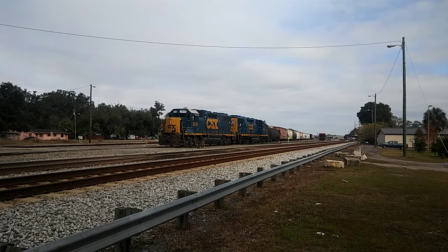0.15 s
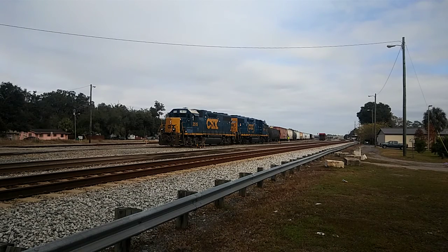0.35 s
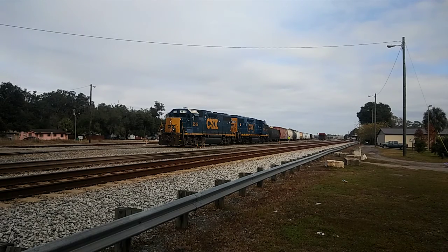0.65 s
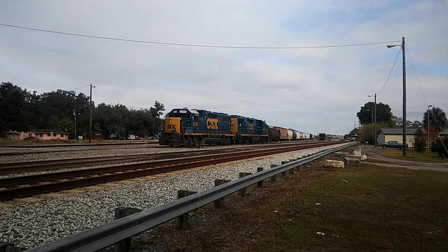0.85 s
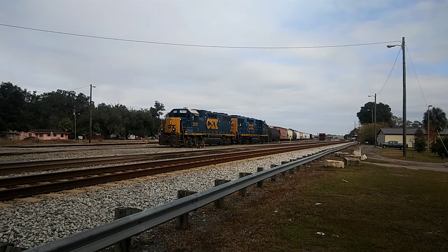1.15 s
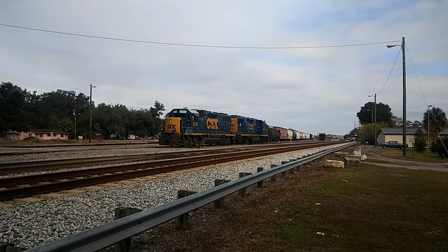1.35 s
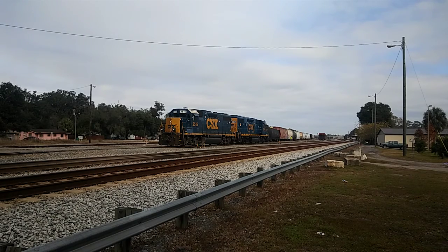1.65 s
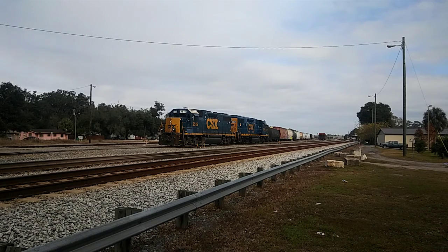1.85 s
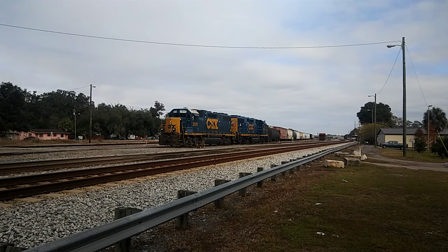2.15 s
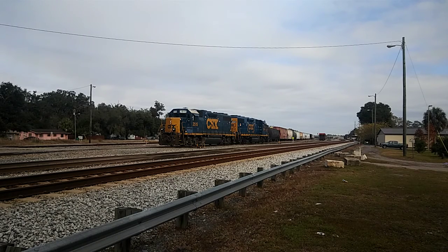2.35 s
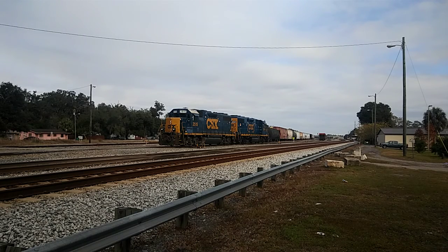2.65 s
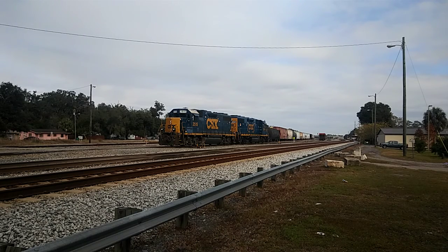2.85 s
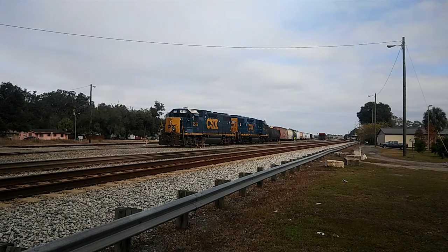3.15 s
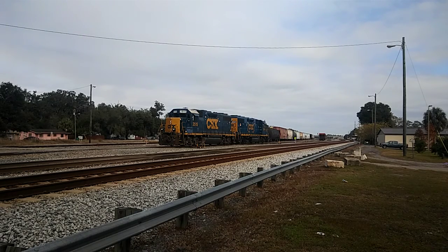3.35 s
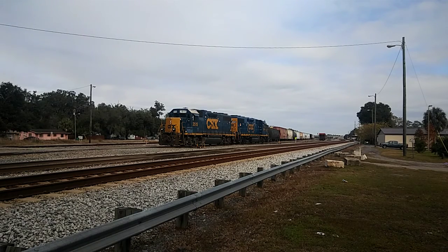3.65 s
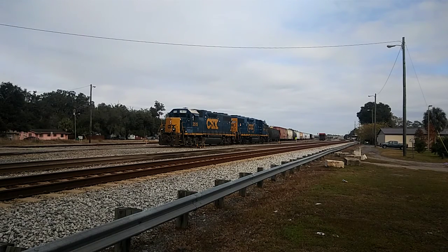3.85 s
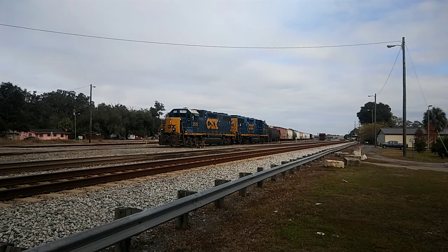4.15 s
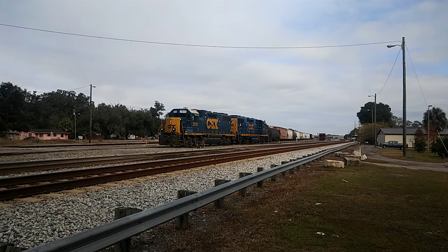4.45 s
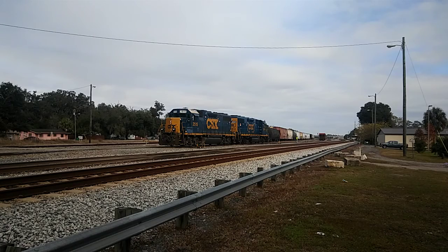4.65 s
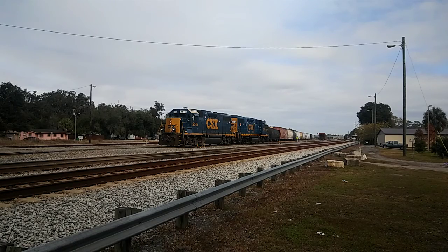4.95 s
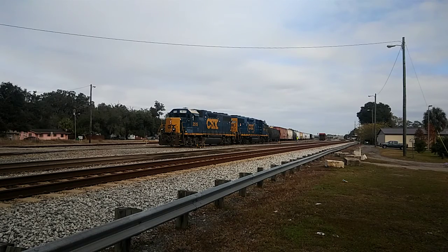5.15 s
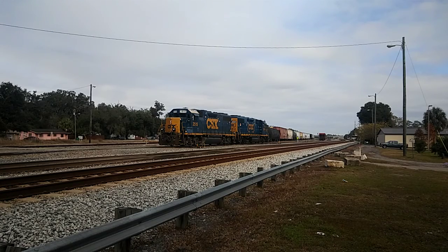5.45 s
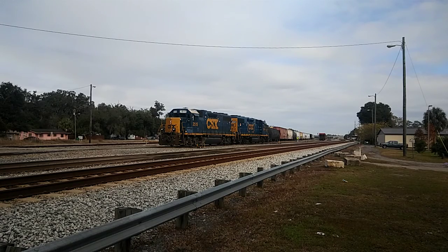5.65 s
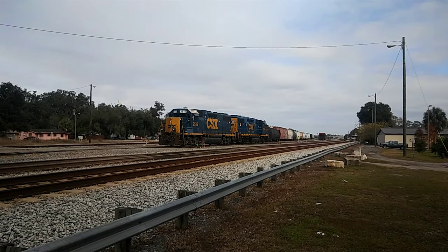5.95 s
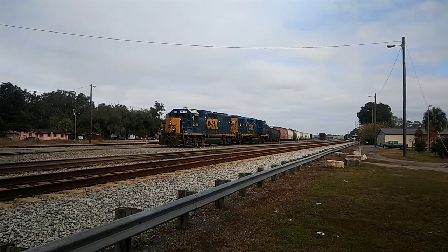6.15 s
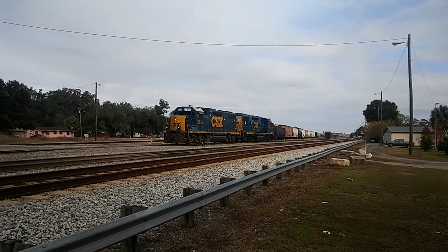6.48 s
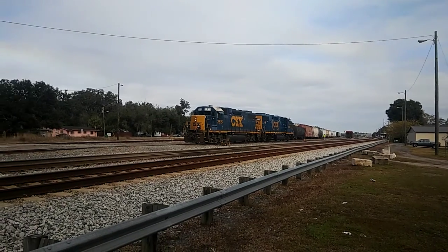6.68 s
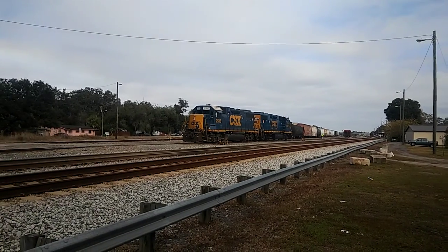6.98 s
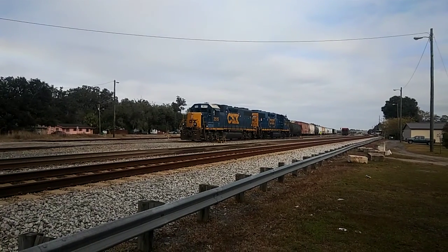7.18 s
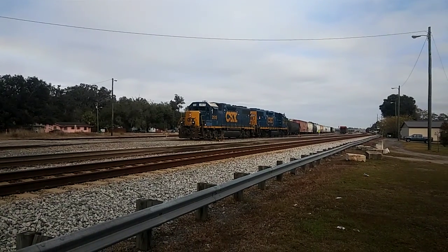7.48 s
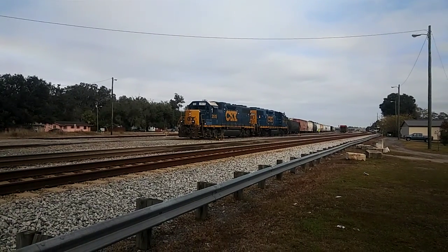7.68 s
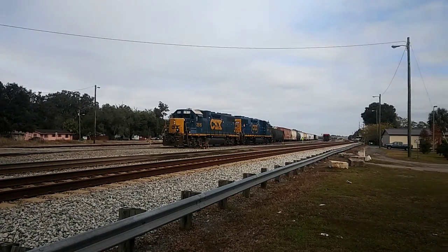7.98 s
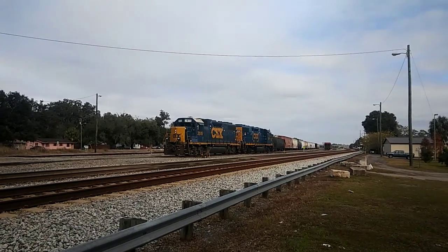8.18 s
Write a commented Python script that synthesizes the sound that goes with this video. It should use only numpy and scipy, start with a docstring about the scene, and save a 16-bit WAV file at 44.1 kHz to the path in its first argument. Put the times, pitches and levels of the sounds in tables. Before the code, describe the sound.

Outdoors in a rail yard, a diesel locomotive idles some way off with quick low chugs, uneven thumps and rattling panels. A thin air leak swells into a brief moan, then a loud hiss vents for over two seconds and cuts off sharply, echoing off wagons and trees. The quieter idle continues with small metal clinks, a wavering gear whine and a few plastic clicks close to the microphone.

```python
"""A diesel locomotive idles some way off in a rail yard: crank-timed exhaust chugs, uneven thumps and knocks,
rattling panels and gear whine, made from ringing noise and swept sines; a thin air leak is coloured noise.
A valve moans, then vents air in a loud hiss for over two seconds and snaps shut; wagons and trees echo it.
Metal clinks now and then (decaying sines); a few small plastic clicks follow close to the microphone."""
import sys
import numpy as np
from scipy import signal
from scipy.fft import rfft, irfft, next_fast_len
from scipy.io import wavfile
from scipy.ndimage import map_coordinates

SR = 44100
rng = np.random.default_rng(int(sys.argv[2]) if len(sys.argv) > 2 else 0)


def to_wav(sig):
    """Store sig (one row per channel, or 1-D mono) as 16-bit WAV at the path in sys.argv[1].

    Samples outside -1..1 are clipped; the rate is SR.
    """
    pcm = np.clip(np.atleast_2d(sig), -1, 1) * 32767
    pcm = np.round(pcm).astype(np.int16)
    wavfile.write(sys.argv[1], SR, pcm.T)  # frames by channels


N = 366972
T = np.arange(N) / SR
SIZE = next_fast_len(N, real=True)
FREQ = np.maximum(np.fft.rfftfreq(SIZE, 1 / SR), 1e-3)  # Hz, kept above 0 for the logarithm

CRANK_HZ, FIRST_CHUG_S = 5.356, 0.135
EASE_DB_PER_S = -0.52  # chugs and exhaust slowly quieten
OPEN_S, SHUT_S = 1.385, 3.758  # valve


def undb(db):
    """Decibels to gain."""
    return 10 ** (np.asarray(db) / 20)


def curve(rows):
    """Rows of (s, value) as a control over time."""
    return np.interp(T, *np.transpose(rows))


def colour(points, peaks=()):
    """Gain over frequency: a smooth slope lifted by resonances."""
    hz, db = np.transpose(points)
    lift_db = sum(d * np.exp(-((FREQ - f) / w) ** 2) for f, w, d in peaks)
    return undb(np.interp(np.log(FREQ), np.log(hz), db) + lift_db)


def resonances(modes):
    """Gain over frequency of summed resonances; modes are (Hz, half width Hz, dB)."""
    return sum(undb(d) / (1 + ((FREQ - f) / w) ** 2) for f, w, d in modes)


def ring(x, gain):
    """Pass an excitation through a response; rms 1."""
    y = irfft(rfft(x, SIZE) * gain, SIZE)[:N]
    return y / np.std(y)


def noise(gain):
    """White noise through a response; rms 1."""
    return ring(rng.standard_normal(N), gain)


def walk(rate_hz):
    """Smooth random control, spread 1, changing about rate_hz times a second."""
    return noise(np.exp(-(FREQ / rate_hz) ** 2))


def burst(start_s, rise_s, t60_s):
    """Envelope of a blow: a linear rise, then an exponential fall."""
    age = T - start_s
    fall = np.exp(-np.log(1000) * np.clip((age - rise_s) / t60_s, 0, 3))
    return np.clip(age / rise_s, 0, 1) * fall


def flutter(x, depth_db, span_hz, rate_hz):
    """Moving outdoor air makes patches of the spectrum swell and fade on their own; the rms is kept."""
    f, t, z = signal.stft(x, SR, nperseg=1024, noverlap=768)
    patches = np.clip(rng.standard_normal((400, 400)), -1.7, 1.7)
    grid = np.meshgrid(f / span_hz, t * rate_hz, indexing="ij")
    swell = map_coordinates(patches, grid, order=3, mode="mirror")
    y = signal.istft(z * undb(depth_db * swell), SR, nperseg=1024, noverlap=768)[1][:N]
    return y * np.std(x) / np.std(y)


def crank_angle():
    """Crank phase in radians, zero at each chug."""
    return 2 * np.pi * CRANK_HZ * (T - FIRST_CHUG_S)


def exhaust():
    """Exhaust and stack resonances swell once per crank turn, each exhaust mode at its own moment."""
    # Each row: resonance in Hz, half width in Hz, relative level in dB, lag behind the crank in radians.
    exhaust_modes = [(201.5, 16, -0.5, 1.1), (135, 14, -3, -.4), (108, 12, -7.5, .3), (84, 8.4, -3, 1.4),
                     (44, 4, -18.5, 0)]
    # Each row: stack resonance in Hz, half width in Hz, relative level in dB.
    stack_modes = [(267, 11, 4), (338.4, 7, 5.5), (390, 9.4, -7), (605, 55, -10)]
    angle = crank_angle()
    pulses = 0
    for hz, width_hz, db, lag in exhaust_modes:
        pulses = pulses + noise(resonances([(hz, width_hz, 0)])) * undb(db + 8.5 * np.cos(angle - lag))
    pulses = pulses * undb(-66 + EASE_DB_PER_S * T)
    stack = noise(resonances(stack_modes)) * undb(-64 + 4.5 * np.cos(angle + 0.26))
    return pulses + stack


def chugs():
    """Each crank turn gives one exhaust chug that sinks in pitch; strength varies at random."""
    centre_hz, sag_oct_per_s, half_length_s = 121.6, 6.3, 0.025
    level_db, scatter_db = -50.5, 0.5
    turns = (T - FIRST_CHUG_S) * CRANK_HZ
    nearest = np.round(turns).astype(int)
    age = (turns - nearest) / CRANK_HZ  # negative before the height of a chug
    draws = rng.standard_normal(nearest.max() + 2)
    strength_db = level_db + scatter_db * draws[nearest + 1]
    phase = 2 * np.pi * np.cumsum(centre_hz * 2 ** (-sag_oct_per_s * age)) / SR
    envelope = undb(strength_db + EASE_DB_PER_S * T) * np.exp(-(age / half_length_s) ** 2)
    return envelope * np.sin(phase + 0.22 * walk(40))


def panels():
    """Engine panels ring as fluttering noise: clatter follows the crank, and one spell shakes harder."""
    # Each row: resonance in Hz, half width in Hz, relative level in dB.
    clatter_modes = [(651, 57, -7), (835.6, 52, 0.5), (1130, 28, -6.5), (1276, 20, 7.5), (1334, 110, -2),
                     (1620, 98, -11), (1885, 45, -8)]
    # Each row: resonance in Hz, half width in Hz, relative level in dB.
    rattle_modes = [(2120, 35, 2), (2430, 52, -4.5), (2530, 230, -2), (2890, 80, 0), (3150, 60, -12.5),
                    (3480, 72, -6.5), (4410, 120, -11), (4860, 61, -19.5)]
    shake_s, shake_width_s, peak_lift_db = 6.09, 0.2, 3
    shake_db = peak_lift_db * np.exp(-((T - shake_s) / shake_width_s) ** 2)
    clatter = flutter(noise(resonances(clatter_modes)), depth_db=11.0, span_hz=132.8, rate_hz=28)
    clatter = clatter * undb(-58 + 0.46 * shake_db + 2 * np.cos(crank_angle()))
    rattle = flutter(noise(resonances(rattle_modes)), depth_db=11.0, span_hz=171.2, rate_hz=32)
    return clatter + rattle * undb(-66.5 + shake_db)


def gear_whine():
    """Gears whine: a tone unsteady in pitch and level, over a narrow noise band."""
    # Each row: time in seconds, level in dB before the floor and lift below.
    whine_level = [(3.92, -63), (4.77, -58.5), (5.3, -88), (5.36, -59), (5.65, -84), (5.74, -60.5),
                   (7.21, -58.5), (7.44, -81), (7.47, -54.5), (7.59, -81), (7.75, -61.5), (8.2, -65)]
    phase = 2 * np.pi * np.cumsum(1690 + 20 * walk(45)) / SR
    tone = np.sin(phase) * (1 + 0.95 * np.tanh(1.3 * walk(16)))
    band = 0.62 * noise(resonances([(1680, 28, 0)]))
    return (tone + band) * undb(np.maximum(curve(whine_level), -74) + 2.5)


def engine_rumble():
    """Broad engine rumble: coloured noise with a moving spectrum."""
    # Each row: frequency in Hz, relative level in dB.
    rumble_colour = [(20, -37), (32, -25), (45, -9), (90, 1), (160, 1.5), (300, -4.5), (600, -1.5),
                     (1000, -9.5), (2000, -21), (3000, -26), (5400, -40), (9000, -49.5), (12300, -43.5),
                     (13500, -60)]
    return flutter(noise(colour(rumble_colour)), depth_db=3.0, span_hz=131, rate_hz=18) * undb(-57.5)


def valve_lift():
    """Valve motion from 0 to 1 up to opening; the fall after it shapes the end of the moan."""
    lift_s, moan_t60_s = 0.15, 0.1
    return burst(OPEN_S - lift_s, lift_s, moan_t60_s)


def valve_leak():
    """Air whistles past the seat as resonant noise, growing as the valve lifts, until it opens."""
    # Each row: frequency in Hz, relative level in dB.
    leak_colour = [(800, -111), (2400, -7.5), (3400, -3), (4600, -13), (5700, -21.5), (8000, -27),
                   (11000, -38), (14000, -54)]
    # Each row: resonance in Hz, half width in Hz, lift in dB.
    leak_peaks = [(2632, 60, 19), (3670, 57, 12), (4358, 91, 20.5), (4560, 110, 17), (4870, 320, 20),
                  (6060, 170, 18), (6416, 77, 22), (7480, 460, 6.5), (8620, 73, 15), (10130, 150, 16),
                  (11860, 579, 21)]
    leak = flutter(noise(colour(leak_colour, leak_peaks)), depth_db=5, span_hz=138.3, rate_hz=13.2)
    return leak * undb(-55.5 + 7.5 * valve_lift()) * (T < OPEN_S)


def thumps(width_hz=55, tail_db=-9, tail_t60_s=0.26, sag=0.22):
    """Uneven heavy firings boom in the stack, sink in pitch and trail off in a rough rumble."""
    # Each row: start in seconds, boom level in dB, stack resonance in Hz.
    firings = [(0, -45.5, 267), (.128, -37.5, 321), (0.265, -38, 346), (0.385, -45.5, 354),
               (.489, -32, 304), (0.861, -42.5, 296), (1.25, -44.5, 327), (1.418, -40.5, 127.4),
               (2.34, -44, 130.5), (2.717, -46, 342), (3.259, -47, 341), (3.41, -47.5, 393),
               (3.59, -25, 210.5), (3.665, -43, 140), (3.68, -41.5, 285), (3.8, -46, 367),
               (3.84, -39, 139.4), (4.441, -41.5, 272), (4.621, -43, 266), (4.803, -36, 263),
               (4.877, -44, 396), (4.983, -37.5, 264.4), (5.179, -42.5, 267), (6.679, -47, 330),
               (6.862, -45.5, 339), (7.44, -49, 409), (7.764, -47.5, 346), (7.879, -46, 325)]
    soft_t60_s, snap_db = 0.145, -25.5  # a firing at snap_db dies twice as fast as a soft one
    out = np.zeros(N)
    grit, wobble = walk(width_hz), walk(width_hz)
    for s, db, hz in firings:
        age = np.maximum(T - s, 0)
        phase = 2 * np.pi * hz * (T - s - sag * 0.011 * np.exp(-age / 0.0096))
        t60_s = soft_t60_s / (1 + undb(db - snap_db) ** 2)
        boom = burst(s, 0.014, t60_s) * np.sin(phase + 0.62 * wobble)
        rough = grit * np.sin(phase) + wobble * np.cos(phase)
        out += undb(db) * (boom + undb(tail_db) * burst(s - 0.015, 0.072, tail_t60_s) * rough)
    return out


def clinks(t60_s=0.21):
    """Loose metal on the locomotive: each part rings briefly at one unsteady pitch."""
    # Each row: start in seconds, peak level in dB, pitch in Hz.
    clink_hits = [(.025, -44.5, 837), (.47, -45, 1357), (1.035, -51, 850), (4.398, -43.5, 853),
                  (4.6, -41.5, 1417), (4.61, -41.5, 763), (5.101, -48, 1282), (5.341, -48.5, 1320),
                  (5.82, -49, 1322), (6.141, -50, 1130), (7.39, -48, 1455), (7.408, -48.5, 1083),
                  (7.901, -47, 1227)]
    wobble = walk(60)
    out = np.zeros(N)
    for s, db, hz in clink_hits:
        out += undb(db) * burst(s, 0.0032, t60_s) * np.sin(2 * np.pi * hz * (T - s) + 0.63 * wobble)
    return out


def knocks(rate_hz=4, centre_hz=350, spread_oct=0.2, level_db=-53, scatter_db=3.5, t60_s=0.082):
    """Lighter firings knock in the stack at random times, strengths and pitches."""
    draws = rng.standard_normal((60, 3))  # log gap, strength, pitch
    times = np.cumsum(np.exp(0.5 * draws[:, 0]) / rate_hz)
    out = np.zeros(N)
    for s, (_, size, pitch) in zip(times, draws):
        if s < T[-1]:
            hz = centre_hz * 2 ** (spread_oct * pitch)
            out += undb(level_db + scatter_db * size) * burst(s, 0.01, t60_s) * np.sin(2 * np.pi * hz * (T - s))
    return out


def valve_moan():
    """Pipe tones, as narrow noise bands, moan ever louder while the valve lifts."""
    # Each row: pipe tone in Hz, half width in Hz, relative level in dB.
    pipe_tones = [(503, 39, 4.5), (1563, 40, -2.5), (2725, 95, -11.5), (3786, 70, -19.5), (4570, 45, -27.5)]
    moan = flutter(noise(resonances(pipe_tones)), depth_db=6.0, span_hz=93.7, rate_hz=22)
    return moan * undb(-37) * valve_lift()


def air_jet():
    """The open valve roars through its resonances; as pressure drops the jet weakens a little and thins."""
    # Each row: frequency in Hz, relative level in dB.
    jet_colour = [(200, -61), (600, -24), (950, -17), (1300, -6), (2000, 0.5), (3000, -1.5), (4400, -1),
                  (5700, -6), (6500, -12.5), (7000, -10), (8700, -16.5), (10200, -16), (13000, -20),
                  (15000, -18)]
    # Vent and underframe. Each row: resonance in Hz, half width in Hz, lift in dB.
    jet_peaks = [(846.5, 67, 17), (1108, 80, 17.5), (1248, 22, 7.5), (1374, 110, 10.5), (1567, 37, 7),
                 (1693, 15, 2), (1790, 250, 5), (2157, 89, 5.5), (2687, 240, 7), (2953, 75, 7),
                 (3186, 130, 6), (3442, 85, 8.5), (3714, 125, 7), (3970, 150, 3.5), (4260, 120, 5.5),
                 (4570, 106, 5), (5260, 53, 3.5), (6285, 360, 7)]
    # Low edge of the hiss, below about 960 Hz, coming and going.
    # Each row: time in seconds, level in dB before a 0.8 dB lift.
    low_edge_level = [(1.42, -54), (1.49, -60.5), (1.67, -39), (1.95, -80.5), (1.99, -45.5), (2.4, -48.5),
                      (2.53, -74), (2.6, -41.5), (2.68, -61), (2.76, -45), (2.89, -65), (3.13, -45),
                      (3.54, -65), (3.6, -80)]
    steady_db, surge_db, surge_s, shut_t60_s = -27, 1.5, 0.77, 0.16
    age = np.clip(T - OPEN_S, 0, SHUT_S - OPEN_S)
    jet = flutter(noise(colour(jet_colour, jet_peaks)), depth_db=2.0, span_hz=99.2, rate_hz=12)
    under = 1 / (1 + (FREQ / 960) ** 30)
    low = 1 / (1 + (FREQ / 1520) ** 20)
    top = 1 / (1 + (7500 / FREQ) ** 12)
    low_edge = flutter(ring(jet, under), depth_db=5, span_hz=200, rate_hz=26)
    low_edge = low_edge * undb(curve(low_edge_level) + 0.8)
    # the roar fades as the pipe empties while the treble grows
    roar = ring(jet, low - under) * undb(-9 - 3.5 * age + 0.3 * walk(8.3))
    hiss = ring(jet, 1 - low - top) * undb(0.44 + 0.27 * walk(13.0))
    fizz = ring(jet, top) * undb(-18 + 1.67 * age + 0.4 * walk(18))
    pressure = undb(steady_db + surge_db * np.exp(-(age / surge_s) ** 2))
    opening = np.clip((T - OPEN_S) / 0.008, 0, 1)
    closing = np.exp(-np.log(1000) * np.clip((T - SHUT_S) / shut_t60_s, 0, 3))
    return ((roar + hiss + fizz) * pressure + low_edge) * opening * closing


def yard(x, wet_db, t60_low_s, absorb_hz, echo_db, echo_s):
    """Scatter from wagons and ballast, air absorbing the treble first, ends in a smeared echo from trees."""
    scatter = 0
    for hz in np.arange(1, 17, 2) * 1000:
        band = np.abs(FREQ - hz) < 1000
        t60_s = t60_low_s / (1 + (hz / absorb_hz) ** 2)
        scatter = scatter + noise(band) * burst(0.005, 0.0032, t60_s)
    # far paths graze the ground, which swallows the middle; nothing returns from beyond the trees
    ground = undb(-8 * np.exp(-((FREQ - 2100) / 600) ** 2))
    scatter = ring(scatter, ground) / (1 + (T / echo_s) ** 12)
    trees = noise(np.exp(-((FREQ - 3900) / 1200) ** 2)) * np.exp(-((T - echo_s) / 0.0514) ** 2)
    tail = undb(wet_db) * scatter / np.linalg.norm(scatter) + undb(echo_db) * trees / np.linalg.norm(trees)
    return x + signal.fftconvolve(x, tail[:SR])[:N]


def clicks(body_t60_s=0.044, ring_t60_s=0.021, snap_t60_s=0.0095, tail_db=-21, tail_t60_s=0.49):
    """Small plastic clicks: a rough knock on a few modes, a gritty ring and a snap, each with a faint tail."""
    # Each row: start in seconds, then body, ring and bright snap levels in dB before the offsets below.
    click_hits = [(6.315, -41.5, -74, -80), (6.333, -46, -70, -52), (6.346, -41, -55, -54),
                  (6.368, -52, -50, -64), (6.379, -52, -72, -59), (6.486, -59, -59.5, -42),
                  (7.202, -45, -54, -83), (7.644, -45, -53, -62), (8.2941, -29, -52, -63)]
    # Each row: body mode in Hz, relative level in dB.
    body_modes = [(1250, -3), (1800, 9), (2600, 2), (3050, -0.5), (4400, -10)]
    ring_colour = [(2500, -22), (4200, -10.5), (5700, -8.5), (7000, -20.5), (8500, -38), (16000, -48)]  # Hz, dB
    ringing = noise(colour(ring_colour))
    snap = noise(resonances([(11530, 700, -19), (14970, 780, -5)]))
    scrape = noise(resonances([(1680, 450, 27), (2580, 900, -41)]))
    grit = undb(1.6 * walk(150))
    out = np.zeros(N)
    for s, body_db, ring_db, snap_db in click_hits:
        tail = undb(tail_db) * burst(s, 0.0084, tail_t60_s)
        body = sum(undb(db) * np.sin(2 * np.pi * hz * (T - s)) for hz, db in body_modes)
        knock = (body + 1.4 * scrape) * burst(s, 0.00049, body_t60_s)
        out += undb(body_db - 11) * (knock + 0.5 * scrape * tail)
        out += grit * ringing * undb(ring_db - 2.0) * (burst(s - 0.003, 0.0067, ring_t60_s) + tail)
        out += grit * snap * undb(snap_db - 3.5) * (burst(s - 0.003, 0.0028, snap_t60_s) + tail)
    return out


def seat_sizzle():
    """The valve seat starts to leak again: fluttering coloured noise fades in near the end."""
    # Each row: frequency in Hz, relative level in dB.
    sizzle_colour = [(2000, -45), (2600, 2), (3000, 2.5), (3900, -14), (4550, 0.5), (5000, -7), (5500, -27),
                     (6200, -17.5), (7200, -38), (12000, -60)]
    start_s, rise_s = 7.34, 1
    sizzle = flutter(noise(colour(sizzle_colour)), depth_db=8, span_hz=170, rate_hz=22)
    return sizzle * undb(-64) * np.clip((T - start_s) / rise_s, 0, 1)


def scene():
    """All sources lie straight ahead, equal in both channels; only the jet gets the yard's echo."""
    locomotive = exhaust() + chugs() + panels() + gear_whine() + engine_rumble()
    locomotive = locomotive + thumps() + clinks() + knocks()
    valve = valve_leak() + valve_moan() + seat_sizzle()
    jet = yard(air_jet(), wet_db=-13.5, t60_low_s=0.97, absorb_hz=12000, echo_db=-35.5, echo_s=0.41)
    mono = locomotive + valve + jet + clicks()
    return np.array([mono, mono])


def record(dry):
    """The recorder cuts the top steeply: an elliptic low-pass."""
    top_hz = 15800
    return signal.sosfilt(signal.ellip(12, 0.1, 80, top_hz, fs=SR, output="sos"), dry)


dry = scene()
out = record(dry)
to_wav(out)
```